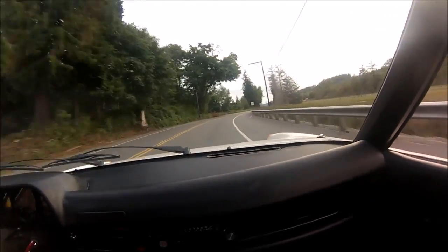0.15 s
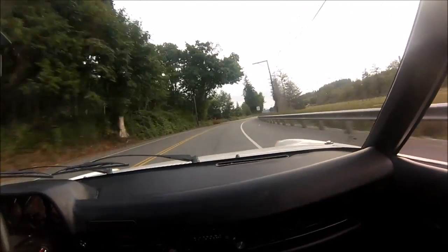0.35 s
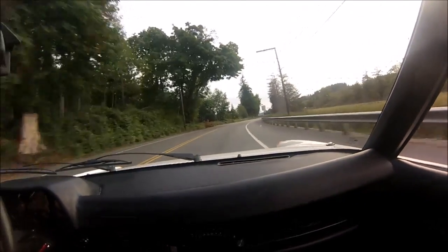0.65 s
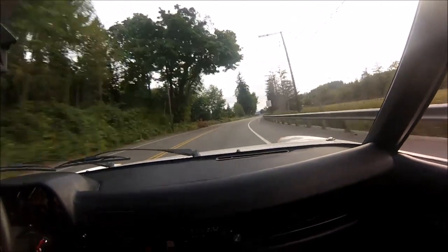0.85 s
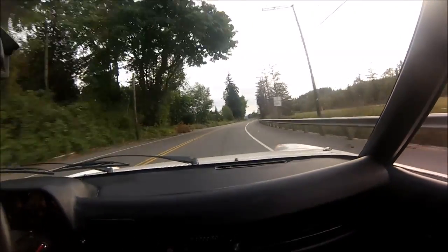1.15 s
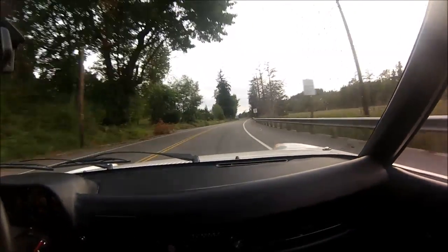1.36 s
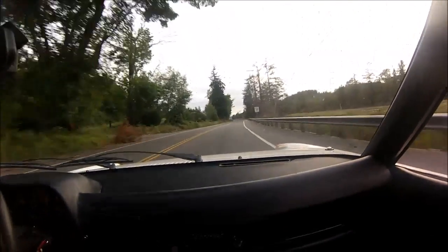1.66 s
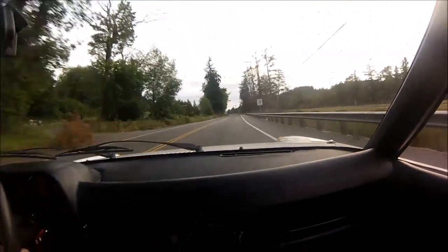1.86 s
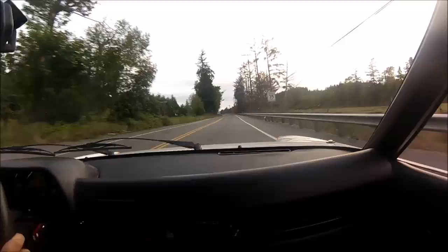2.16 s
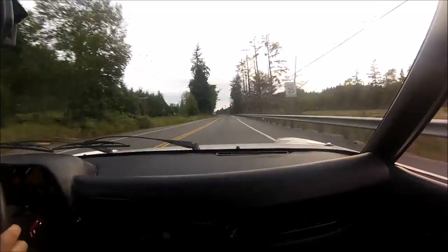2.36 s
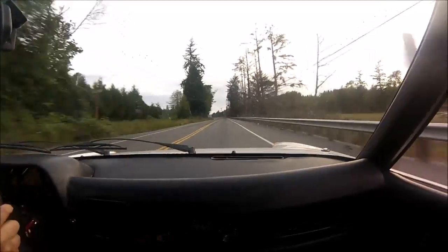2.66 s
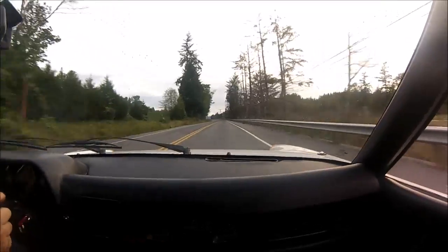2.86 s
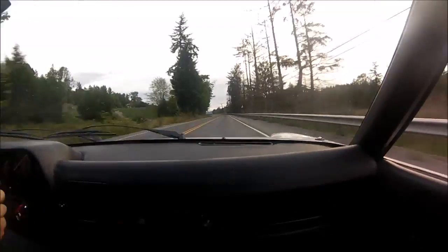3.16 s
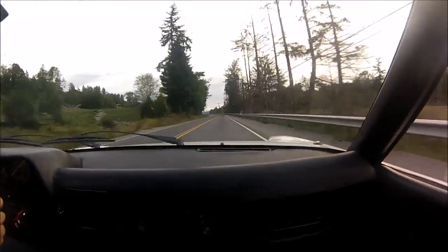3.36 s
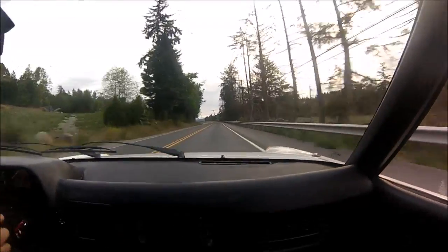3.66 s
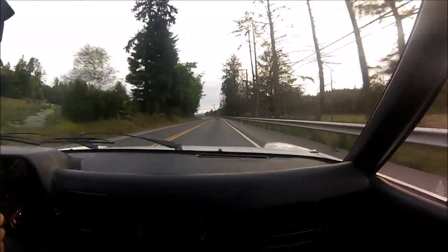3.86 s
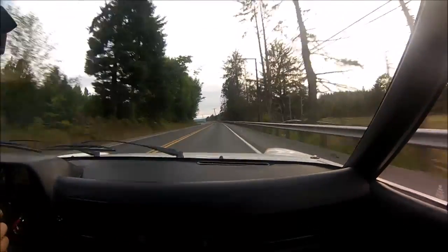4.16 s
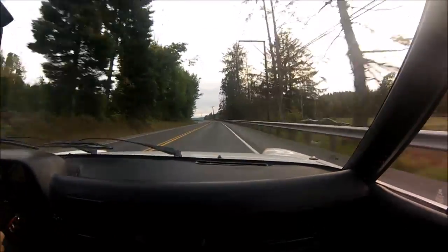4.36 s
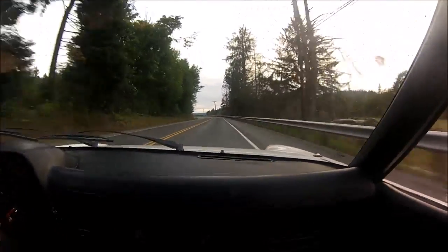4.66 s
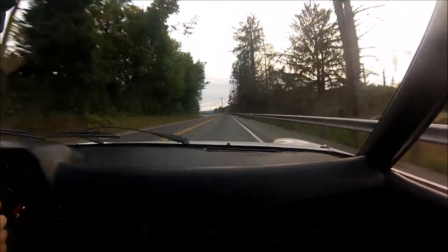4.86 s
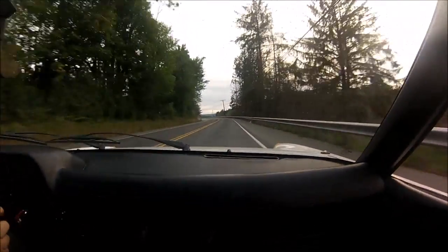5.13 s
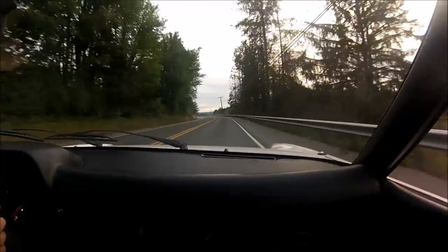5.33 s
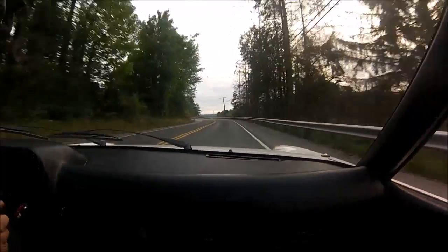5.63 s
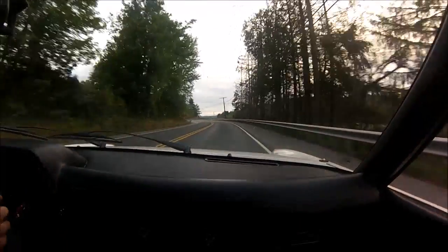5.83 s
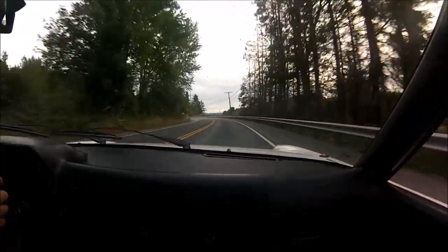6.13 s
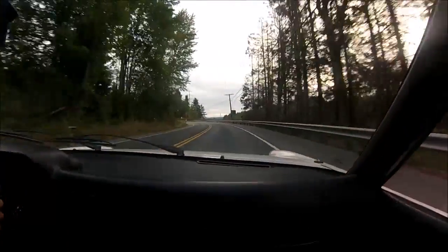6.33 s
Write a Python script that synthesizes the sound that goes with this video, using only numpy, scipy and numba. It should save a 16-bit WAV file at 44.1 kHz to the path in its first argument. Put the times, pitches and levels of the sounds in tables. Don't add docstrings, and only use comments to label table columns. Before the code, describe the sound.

Cabin of an old air-cooled car: brief intake rasp and pops, a long droning pull, then coasting amid road roar, bumps and wind.

```python
import sys
import numpy as np
from scipy import signal
from scipy.fft import rfft, irfft, next_fast_len
from scipy.io import wavfile
from scipy.ndimage import uniform_filter1d
from numba import njit

SR = 44100
rng = np.random.default_rng(int(sys.argv[2]) if len(sys.argv) > 2 else 0)


def transcribe(u):
    v = np.clip(np.atleast_2d(u).T, -1, 1)
    q = np.round(v * 32767).astype(np.int16)
    wavfile.write(sys.argv[1], SR, q)


def elevation(decibels):
    levels = np.asarray(decibels, float)
    return 10 ** (levels / 20)


N = 286209
T = np.arange(N) / SR

# (time [s], push as signed pressure [full scale], gain drop [dB])
ROAD_BUMPS = [(0.22, -0.39, 3), (0.35, -0.23, 2.5), (0.633, 0.26, 5), (1.01, -0.18, -1.5),
              (1.153, 0.29, 1.5), (1.351, -0.13, 1), (1.836, -0.18, 1.5), (2.0, 0.075, 1.5),
              (2.156, -0.076, 0.5), (2.746, -0.11, -0.5), (3.001, 0.18, 1.5), (3.254, 0.22, 4.5),
              (3.401, -0.31, 2), (3.523, 0.31, 1.5), (3.686, -0.15, 1), (4.011, -0.23, 4.5),
              (4.354, 0.22, 0.5), (4.434, -0.15, 2.5), (4.63, 0.18, 1.5), (4.902, -0.39, 3),
              (5.013, -0.61, 5), (5.139, -0.29, 2), (5.29, -0.3, 2), (5.327, 0.33, 1.5),
              (5.352, -0.24, 1.5), (5.626, 0.25, 3), (5.871, 0.13, 0.5), (5.934, -0.15, 2.5),
              (6.012, 0.51, 3.5), (6.157, 0.16, 5.5)]


def columns(table):
    s, *rest = np.transpose(table)
    return [np.interp(T, s, column) for column in rest]


def on_log(hz, table):
    f, db = np.transpose(table)
    return np.interp(np.log(hz), np.log(f), db, left=-200)


def walk(rate, size=1):
    hold = int(SR / rate / size)
    count = -(-N // size)
    steps = np.repeat(rng.standard_normal(count // hold + 1), hold)
    return 1.3 * uniform_filter1d(uniform_filter1d(steps, hold), hold)[:count]


def noise(table, flicker_db, rate, count):
    size = next_fast_len(N)
    hz = np.maximum(np.arange(size // 2 + 1) * SR / size, 1)
    spectrum = rfft(rng.standard_normal(size)) * elevation(on_log(hz, table))
    place = np.interp(np.log(hz), np.log([table[0][0], table[-1][0]]), [0, count - 1])
    out = np.zeros(N)
    for k in range(count):
        band = irfft(spectrum * np.clip(1 - abs(place - k), 0, 1), size)[:N]
        out += band * elevation(flicker_db * walk(rate))
    return out / np.std(out)


def swells(steady_db, table):
    gain = elevation(steady_db)
    for s, db, rise, fall in table:
        gain = gain + elevation(db) * np.exp(-((T - s) / np.where(T < s, rise, fall)) ** 2)
    return gain


def lift_db(hz, table):
    return sum(db / (1 + (2 * (hz - centre) / width) ** 2) for centre, width, db in table)


def drive():
    # (time [s], rate [Hz])
    revs = [(0, 32.9), (.35, 32.6), (.7, 32.65), (.96, 33.03), (2.0, 34.18), (3.13, 35.5), (4.14, 36.71),
            (4.48, 36.69), (4.75, 36.3), (5.19, 35.99), (5.75, 35.4), (6.49, 34.6)]
    # (time [s], pedal [0-1])
    foot = [(0, 0), (.38, 0), (.46, .15), (.65, .3), (.8, .5), (.9, .8), (1.0, .9), (1.45, 1), (3.65, 1),
            (3.9, .96), (4.02, .86), (4.12, .5), (4.3, .36), (4.46, .3), (4.54, .14), (4.6, 0), (6.49, 0)]
    # (pedal [0-1], open-throttle pull [dB], part-throttle rasp [dB])
    throttle = [(0, -30, -30), (.15, -30, -5), (.3, -25, 0), (.5, -14, -1), (.8, -3, -3), (.9, 0, -10),
                (1, 0, -30)]
    hz, = columns(revs)
    pedal, = columns(foot)
    opening, *laws = np.transpose(throttle)
    pull_db, part_db = (np.interp(pedal, opening, law) for law in laws)
    return hz, np.cumsum(hz) / SR, pull_db, part_db


def engine(hz, cycle, pull_db, part_db):
    # (multiple of the cycle, pulling at low revs [dB], at high revs [dB], part throttle [dB])
    order_db = [(1, -30, -29, -33), (2, -31, -34, -38), (3, -54, -37, -30), (4, -24.5, -23, -41),
                (5, -27.5, -30, -30.5), (6, -32.5, -36, -52), (7, -23.5, -25, -45), (8, -56, -40, -39),
                (9, -39, -31.5, -37), (10, -38.5, -50, -42.5), (11, -39.5, -55, -46), (12, -53, -47, -51),
                (13, -60, -55, -50), (14, -56, -56, -56), (15, -40.5, -38, -38.5),
                (16, -41.5, -46.5, -44.5), (17, -56, -53, -44), (18, -42, -51, -52.5),
                (19, -42, -36.5, -47), (20, -46, -40, -43), (21, -51, -46, -54), (22, -43.5, -57, -43),
                (23, -51, -50.5, -59), (24, -48, -37.5, -40), (25, -52, -36.5, -44.5),
                (26, -53, -59.5, -49), (27, -45, -44, -54), (28, -62, -47, -60), (29, -54, -49.5, -51.5),
                (30, -68, -54, -42)]
    pull_hz = [33.4, 36.15]
    coast_db = {3: -36.5, 4: -29.5, 6: -35.5, 7: -37.5, 8: -40.5}
    # (centre [Hz], width [Hz], boost [dB])
    cabin = [(130, 16, 6), (312, 30, 6), (840, 42, 12), (944, 40, 8), (1700, 160, 8)]
    # (centre [Hz], width [Hz], boost [dB])
    intake = [(587, 40, 19)]
    out, step = np.zeros(N), 64
    slow, pull, part = hz[::step], elevation(pull_db[::step]), elevation(part_db[::step])
    unsteady = 1 - np.minimum(np.hypot(pull, part), 1)
    for k in range(1, 56):
        f = k * slow
        if k > len(order_db):
            high_db = -55 - .55 * (k - len(order_db)) + 1.5 * rng.standard_normal()
            size = np.hypot(pull, part) * elevation(high_db)
        else:
            _, low_db, high_db, feather_db = order_db[k - 1]
            pulling = pull * elevation(np.interp(slow, pull_hz, [low_db, high_db]))
            feathered = part * elevation(feather_db + lift_db(f, intake))
            size = np.sqrt(pulling ** 2 + feathered ** 2 + elevation(coast_db.get(k, -70)) ** 2)
        boom_db = lift_db(f, cabin)
        waver_db = (.4 + .045 * min(k, 25) + 1.5 * unsteady) * walk(9, size=step)
        slip = (.012 + .07 * unsteady) * k * walk(12, size=step) + 2 * np.pi * rng.random()
        size = np.interp(T, T[::step], size * elevation(boom_db + waver_db))
        slip = np.interp(T, T[::step], slip)
        out += np.sqrt(2) * size * np.sin(2 * np.pi * k * cycle + slip)
    return elevation(-2.25) * out


def intake_rasp(part_db):
    # (frequency [Hz], level [dB per Hz])
    colour = [(280, -30), (340, -7), (430, -23), (520, 5.0), (600, -11.0), (700, -10), (900, -88)]
    return elevation(part_db - 41) * noise(colour, 2.2, 23, count=3)


def pops():
    # (time [s], ring [Hz], peak [dB], time to fall 60 dB [s])
    burns = [
        (.418, 515, -26, .09),
        (.465, 335, -21, .07),
        (.478, 520, -21, .08),
        (.507, 550, -23, .07),
        (.524, 595, -25, .07),
        (.56, 590, -28, .08),
        (.595, 560, -24, .07),
        (.612, 510, -27, .06),
    ]
    out = np.zeros(N)
    for s, hz, db, t60 in burns:
        after = np.clip(T - s, 0, 1)
        rise = 1 - np.exp(-after / 0.0038)
        out += elevation(db - 60 * after / t60) * rise * 2 * np.sin(2 * np.pi * hz * after)
    return out


def bumps():
    out = np.zeros(N)
    for s, push, _ in ROAD_BUMPS:
        near = slice(max(int((s - .06) * SR), 0), int((s + .06) * SR))
        after = T[near] - s
        out[near] += 1.05 * push * np.exp(-(after / 0.0089) ** 2) * np.cos(2 * np.pi * 41.0 * after)
    return out


def road_and_air():
    # (time [s], road noise [dB], air noise [dB])
    journey = [(0, -1.5, 0), (.3, 2, 0), (.8, 2, 0), (1.05, -4.5, 0.5), (1.45, -2.5, -2), (2.0, -1.5, -3.5),
               (2.4, -5, -2.5), (2.9, -3.5, -1), (3.45, 2.5, -.5), (3.9, 0, 2.5), (4.28, 1.5, 4),
               (4.7, 1, -0.5), (5.0, 1.5, 2.5), (5.3, 2.5, -0.5), (5.7, 0.5, 0), (5.95, 2, 3),
               (6.2, 3.5, 1), (6.49, 0, -1)]
    return columns(journey)


def road_rumble(road_db):
    # (frequency [Hz], level [dB per Hz])
    colour = [(7.1, -32), (12, -6), (38, 3), (86, -10), (130, -5), (170, -32), (290, -120)]
    shaking = noise(colour, 0.3, 5.6, count=3)
    flattening = (0.79 + uniform_filter1d(shaking ** 2, size=1800)) ** 0.4
    return shaking * elevation(road_db - 18) / flattening


def puffs(cycle, depth):
    turn = 2 * np.pi * cycle
    return 1 + depth * (np.cos(turn) + .8 * np.cos(2 * turn + 1.1) + .9 * np.cos(3 * turn + 2.2))


def cabin_roar(cycle, road_db, air_db):
    # (frequency [Hz], level [dB per Hz])
    colour = [(53, -37), (90, -5), (150, -2.5), (172, -4.5), (217, -4), (252, -17), (285, -7.5), (397, -13),
              (559, -17), (616, -17.5), (707, -19), (956, -17), (1330, -28.5), (1750, -24.5), (2400, -58.5),
              (3120, -78), (5280, -120)]
    roar_db = -26 + 0.29 * road_db + 1.15 * air_db
    return elevation(roar_db) * puffs(cycle, .15) * noise(colour, .9, 12, count=8)


def shield_rattle(hz, cycle):
    # (frequency [Hz], level [dB per Hz])
    buzz = [(4800, -25), (5050, -4), (5200, -9), (5550, 7), (5850, -5), (6300, -85)]
    # (time [s], peak [dB], rise [s], fall [s])
    shakes = [
        (.8, -54, 0.2, 0.17),
        (1.15, -56.5, 0.19, .2),
        (2.9, -58, .12, .1),
        (3.75, -56, .1, .15),
        (4.17, -46, 0.17, .12),
    ]
    cycle = cycle + 0.93
    chance = rng.standard_normal((300, 2))[cycle.astype(int)]
    ring_hz = 5190 + 45 * chance[:, 0]
    turn = cycle % 1
    blow = (1 - np.exp(-turn / .08)) * np.exp(-turn / .35) * (1 - turn)
    clear = np.interp(hz, [33.6, 34.5], [1, .2])
    strength = elevation(1.8 * chance[:, 1] + 2 * walk(150))
    ring = 4.6 * clear * strength * blow * np.sin(2 * np.pi * np.cumsum(ring_hz) / SR)
    return swells(-65, shakes) * (ring + .5 * noise(buzz, 1.5, 40, count=2))


def wind(cycle, air_db):
    # (frequency [Hz], level [dB per Hz])
    colour = [(1180, -10.5), (2000, -1.5), (2270, -9), (2900, -1.5), (3450, -7), (3950, -3.5), (4770, -11),
              (5280, -4.5), (6470, -13), (7400, -12), (8910, -18.5), (9780, -16.5), (11400, -23),
              (12300, -20), (15000, -39.5)]
    return elevation(air_db - 48) * puffs(cycle, .06) * noise(colour, .7, 14, count=6)


def hiss():
    # (frequency [Hz], level [dB per Hz])
    colour = [(3650, -25), (6200, 0), (6680, -6), (8160, -0.5), (10300, -5.5), (12300, -7), (15000, -10)]
    # (time [s], peak [dB], rise [s], fall [s])
    gusts = [
        (.76, -48, 0.23, 0.37),
        (4.28, -48.5, .11, 0.14),
        (5.9, -63, 0.066, .08),
    ]
    return elevation(-3.5) * swells(-64.5, gusts) * noise(colour, 1.2, 8.44, count=3)


def scene():
    hz, cycle, pull_db, part_db = drive()
    road_db, air_db = road_and_air()
    motor = engine(hz, cycle, pull_db, part_db) + intake_rasp(part_db) + pops()
    road = bumps() + road_rumble(road_db) + cabin_roar(cycle, road_db, air_db)
    air = wind(cycle, air_db) + hiss()
    return (motor + road + shield_rattle(hz, cycle) + air)[None]


@njit
def follow(x, attack, release):
    out, e = np.empty(len(x)), 0.
    for i in range(len(x)):
        e += (abs(x[i]) - e) * (attack if abs(x[i]) > e else release)
        out[i] = e
    return out


def low_pass(x):
    return signal.sosfilt(signal.butter(12, 15190, fs=SR, output="sos"), x)


def record(dry):
    drop_db = np.zeros(N)
    for s, _, db in ROAD_BUMPS:
        after = np.maximum(T - s, 0)
        drop_db += 1.4 * db * (1 - np.exp(-after / 0.0015)) * np.exp(-(after / 0.11) ** 1.4)
    level = dry * elevation(2.5 - drop_db)
    attack_s, release_s = 0.0021, 0.094
    peak = follow(level[0], 1 / (attack_s * SR), 1 / (release_s * SR))
    level = level / np.maximum(peak / 0.33, 1) ** 0.69
    level = level * np.minimum((T[-1] - T) / .002, 1)
    return low_pass(np.tanh(0.9 * level) / 0.88)


dry = scene()
out = record(dry)
transcribe(out)
```